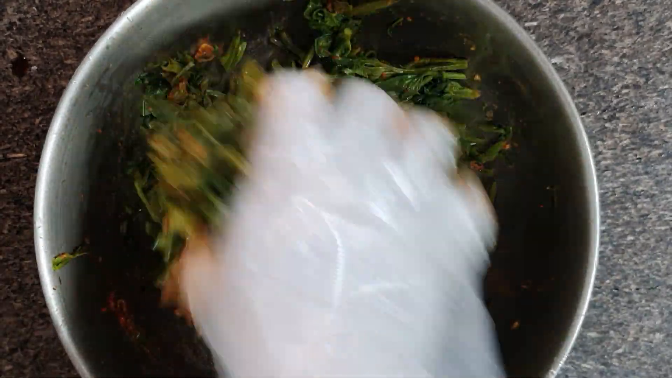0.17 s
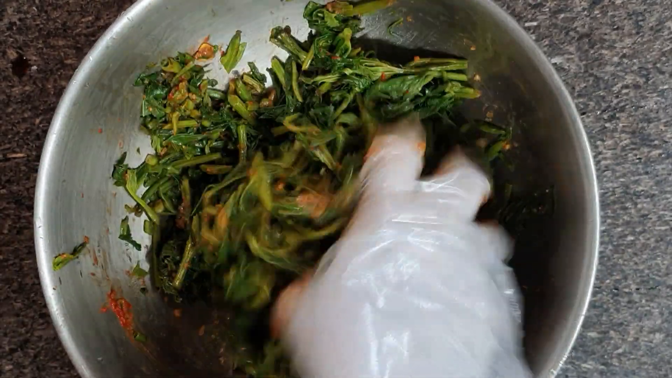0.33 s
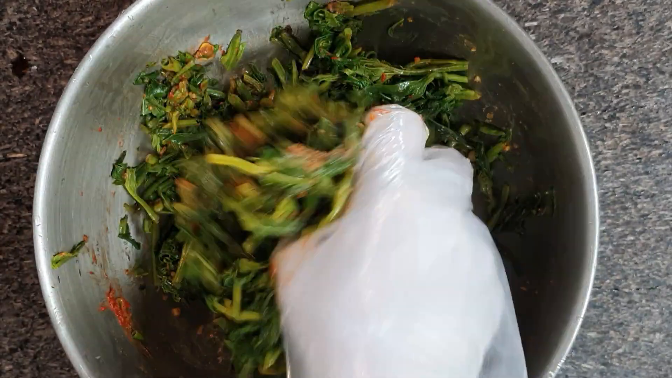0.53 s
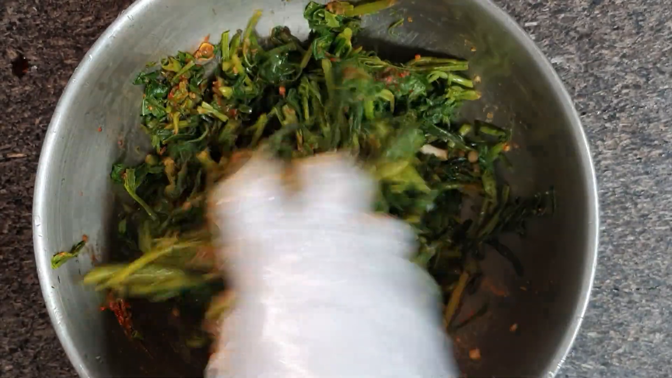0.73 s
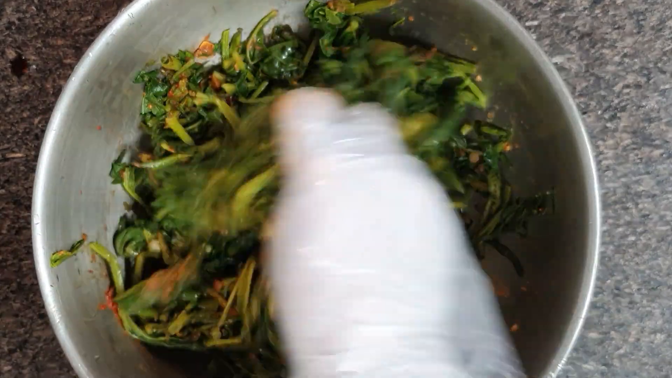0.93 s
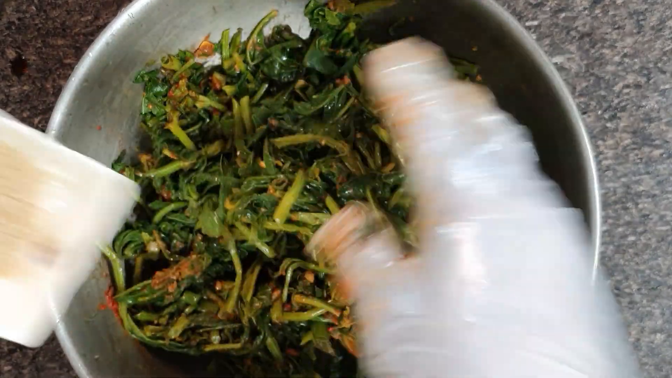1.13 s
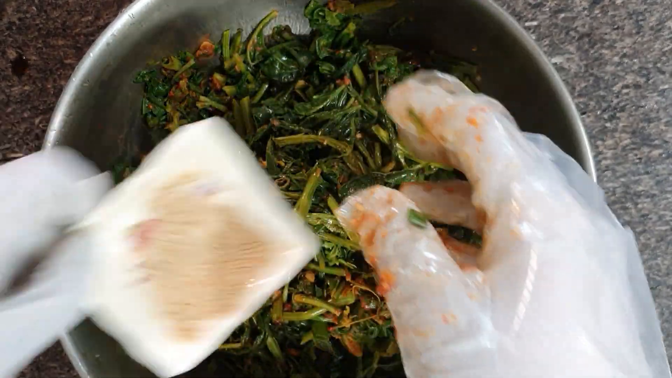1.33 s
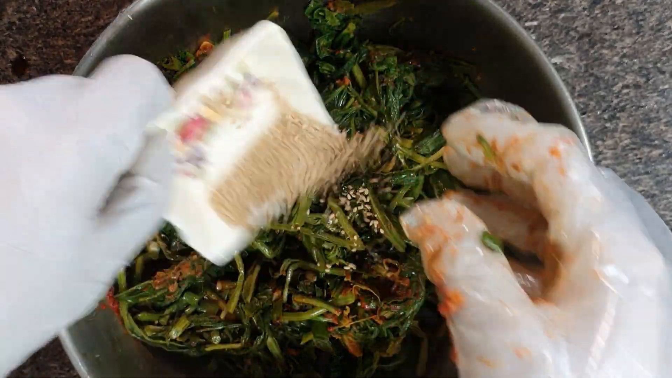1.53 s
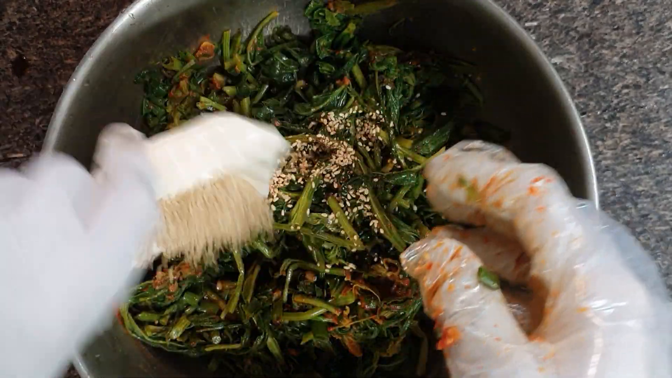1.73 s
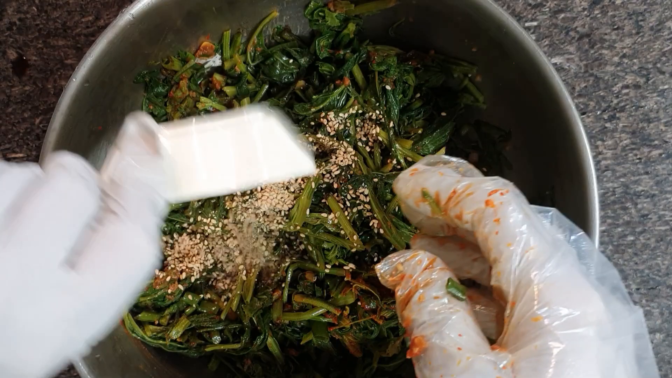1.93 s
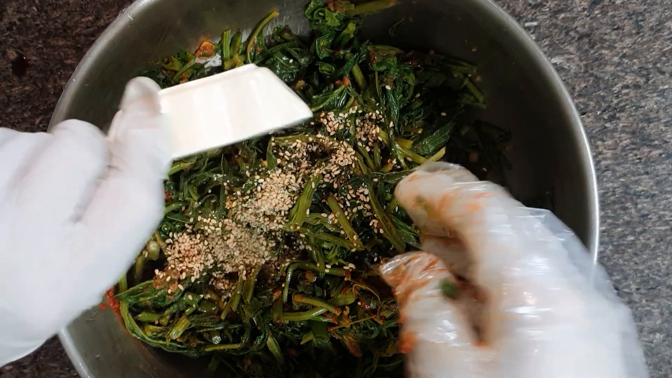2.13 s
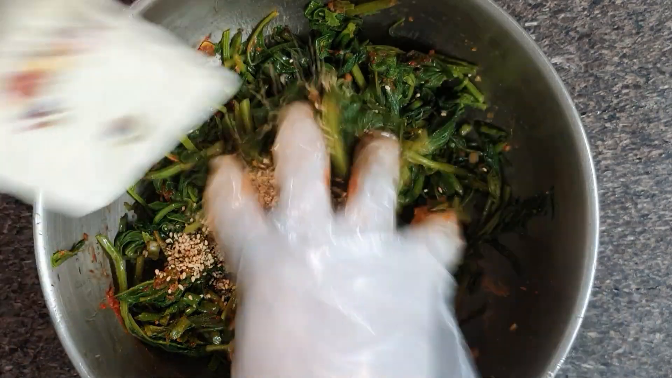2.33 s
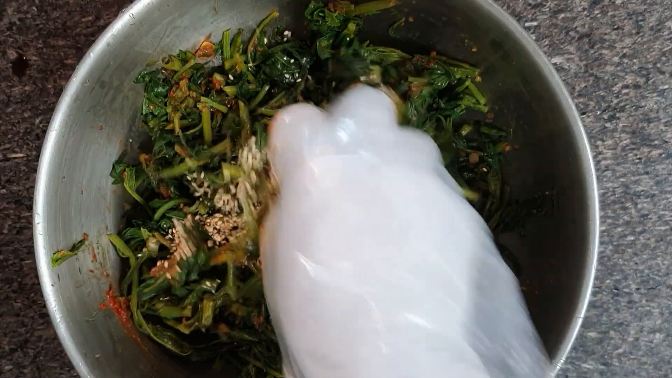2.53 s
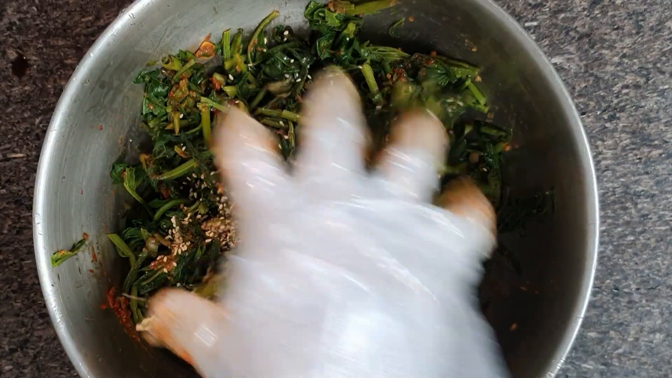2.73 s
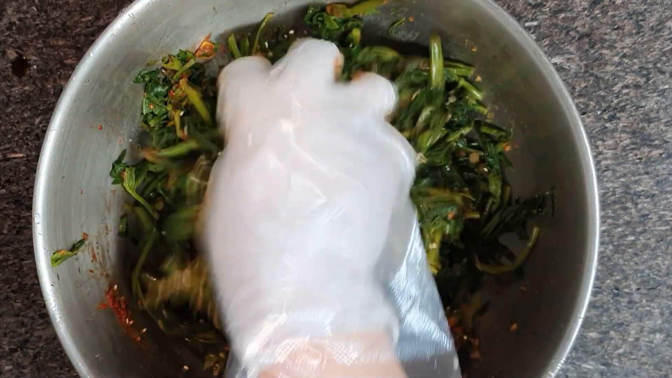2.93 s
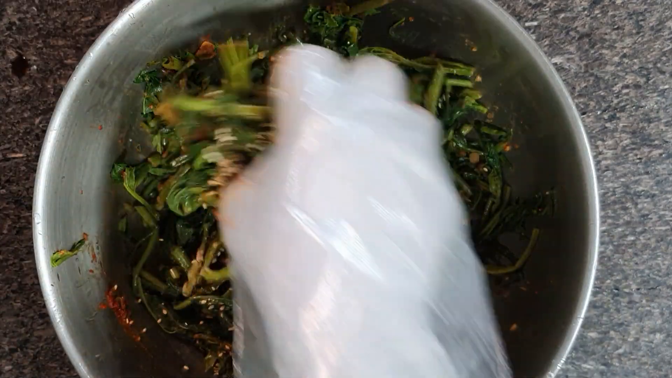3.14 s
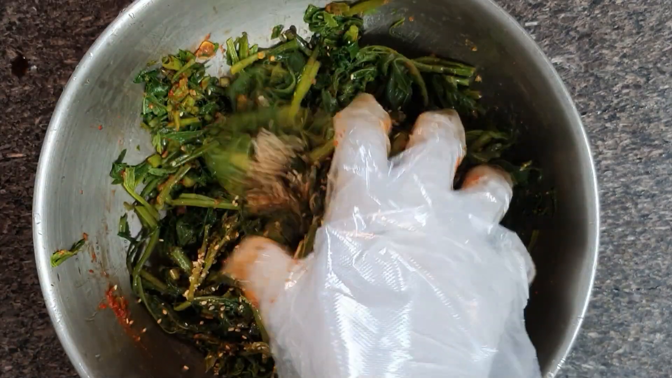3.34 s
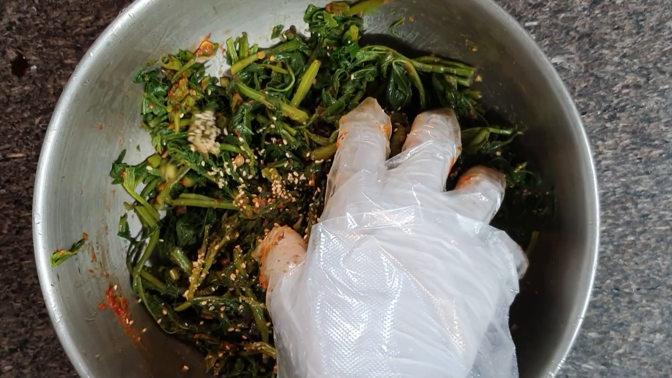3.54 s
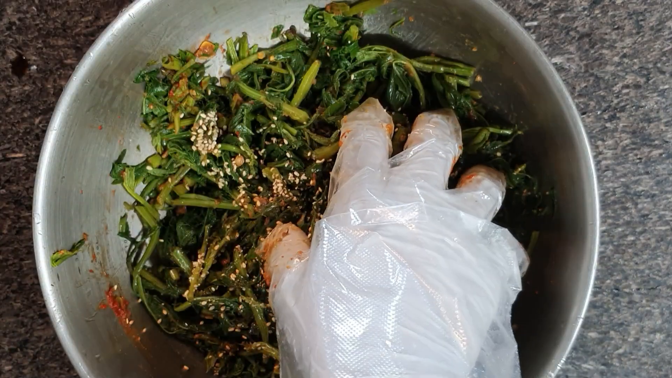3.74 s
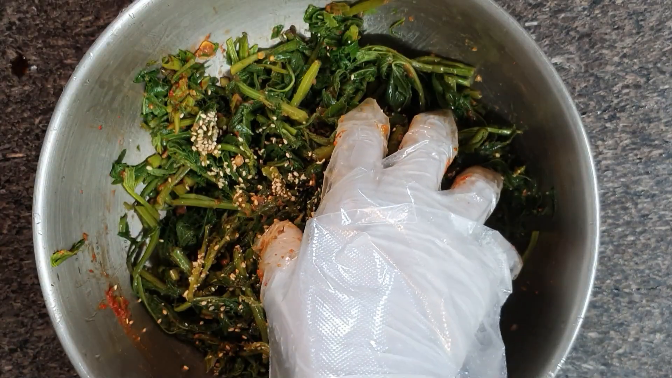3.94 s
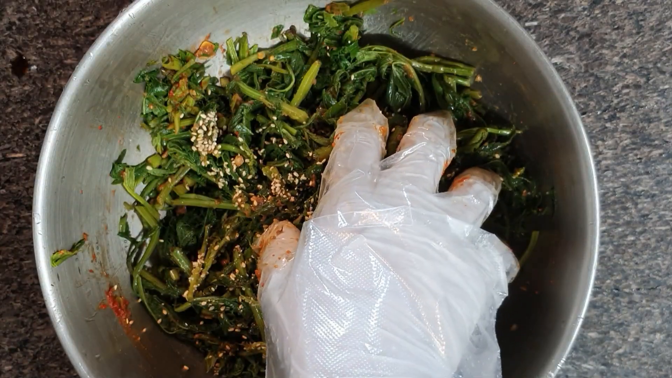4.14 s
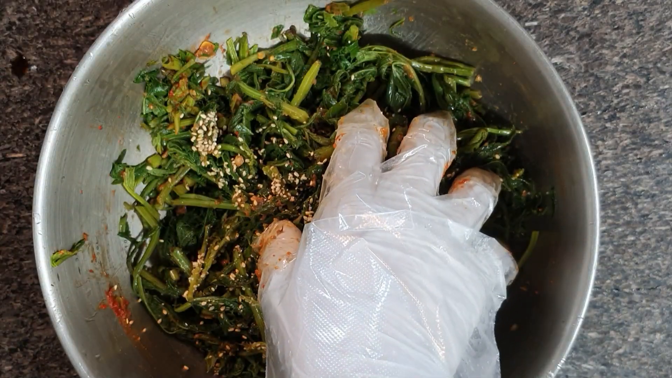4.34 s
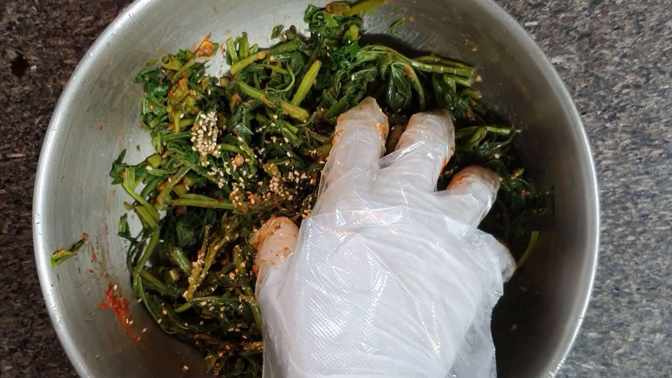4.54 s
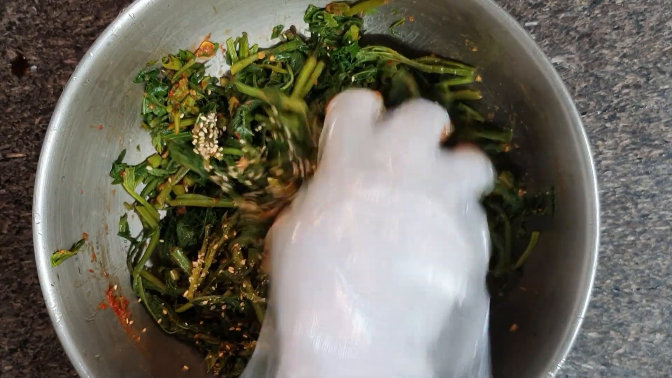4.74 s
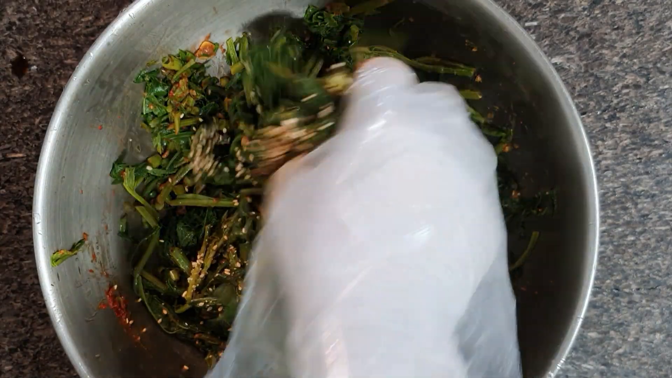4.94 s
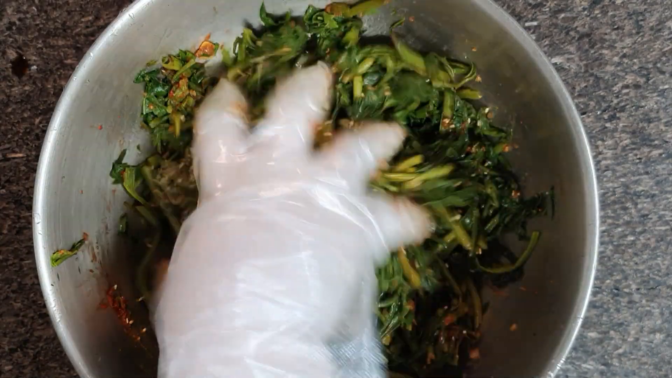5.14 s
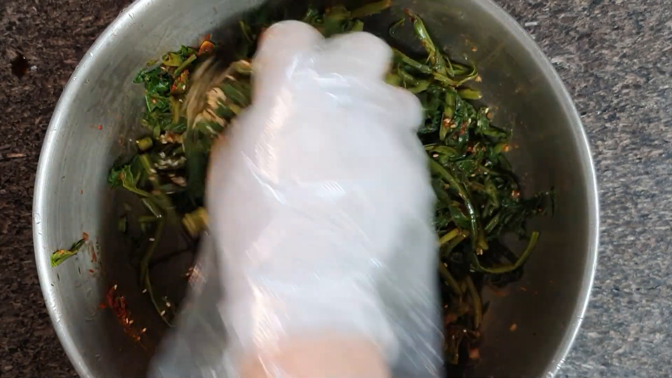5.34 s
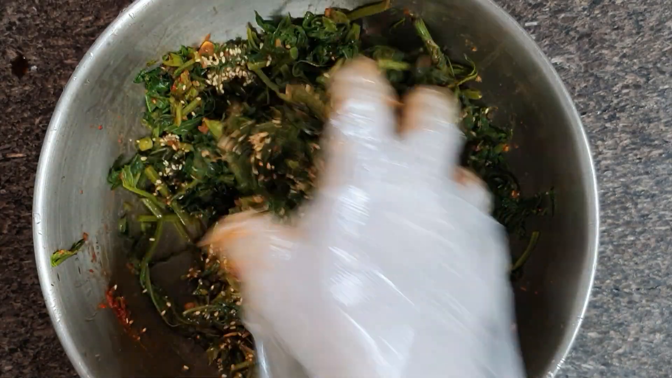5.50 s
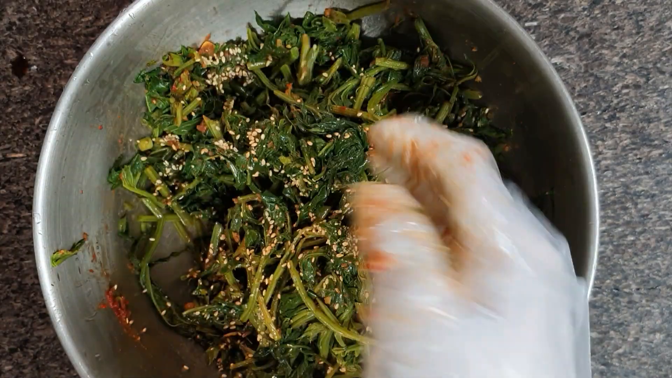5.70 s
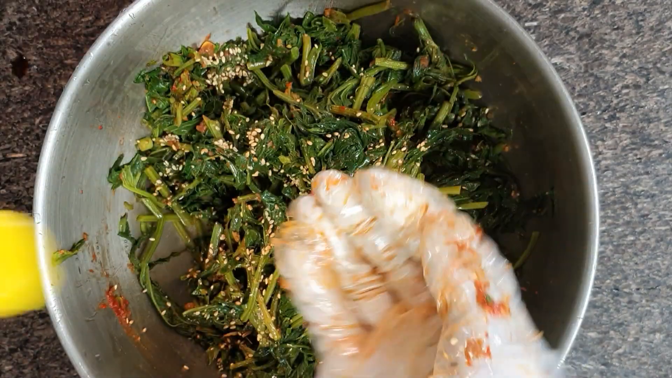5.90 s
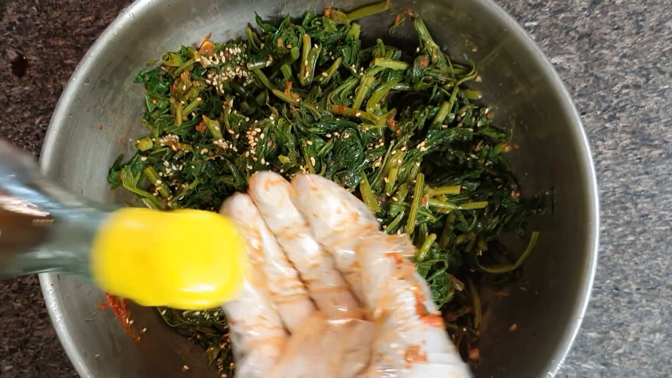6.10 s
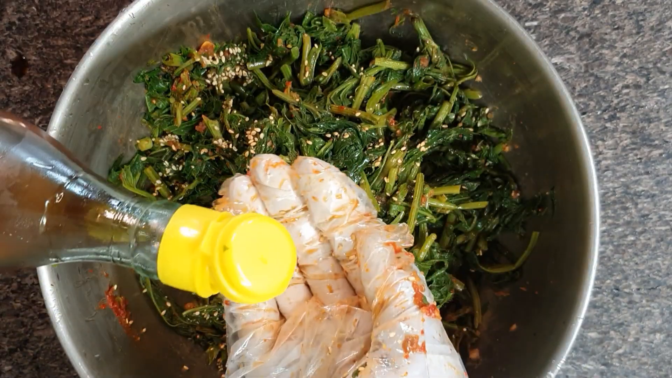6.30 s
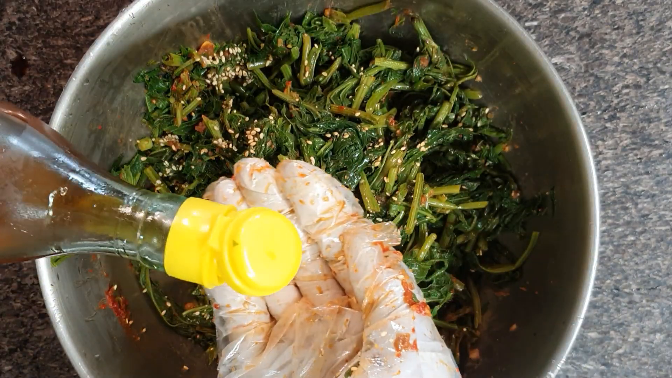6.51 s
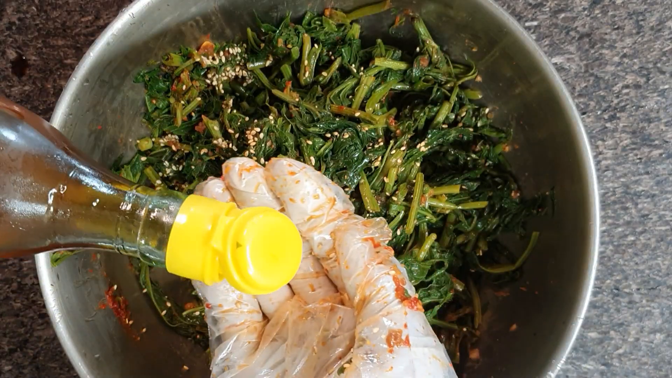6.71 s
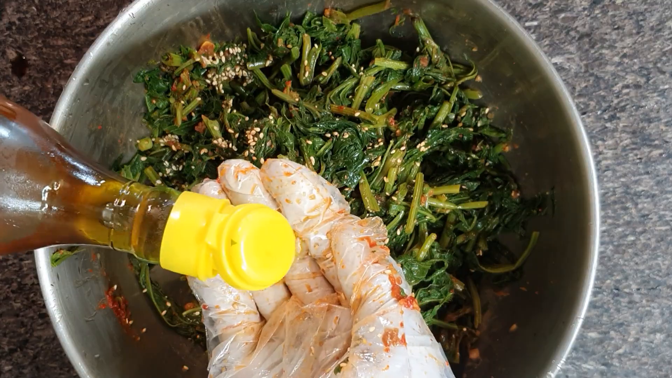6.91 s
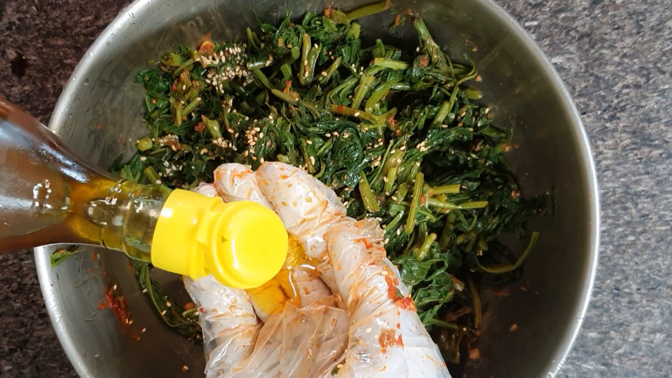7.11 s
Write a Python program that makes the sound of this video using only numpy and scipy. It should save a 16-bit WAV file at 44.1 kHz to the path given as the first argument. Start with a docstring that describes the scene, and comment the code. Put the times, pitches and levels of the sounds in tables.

```python
"""A hard kitchen, microphones close above a stone counter: a fridge rumbles and hums from the start.
Right under the microphones thin plastic gloves crackle in swarms of tiny clicks, over wet greens that
slap and pop in a steel bowl. Sesame seeds patter off a small dish, as bright grains; then the dish clinks
down at the left and bounces, as dying modes over a clatter of the counter. Last, a cupboard door knocks
and judders, its panels ringing, while the hands work on; tiles and stone add a short tail."""
import sys
import numpy as np
from scipy import signal
from scipy.fft import rfft, irfft, next_fast_len
from scipy.io import wavfile
from scipy.ndimage import uniform_filter1d

SR = 44100
rng = np.random.default_rng(int(sys.argv[2]) if len(sys.argv) > 2 else 0)


def bounce(signal):
    """Save signal as a 16-bit WAV file at the path given by the first command-line argument."""
    frames = np.transpose(np.atleast_2d(signal))
    limited = np.clip(frames, -1, 1)
    pcm = np.round(limited * 32767).astype(np.int16)
    wavfile.write(sys.argv[1], SR, pcm)


N = 320166

# In all tables levels are relative, and a left-right balance above 0 dB leans to the left.
# Fridge and air as a filter. Each row: frequency in Hz, gain in dB.
HUSH_SPECTRUM = [(12, -71), (20, -48.5), (48, -8), (102, -15.5), (265, 0.5), (289, -8), (506, -11.5),
                 (551, -15), (599, -10.5), (709, -19.5), (863, -21.5), (1020, -26.5), (1700, -40.5),
                 (2200, -40), (3140, -50.5), (15200, -43.5), (16500, -67.5)]
# Slow swell of the fridge and air. Each row: time in seconds, gain in dB.
HUSH_SWELL = [(0, 1.5), (2, 2), (4, 1), (5.8, 1.5), (6.3, 0.5), (7.26, 0.5)]
# Mains hum. Each row: frequency in Hz, level in dB.
HUM_TONES = [(59, -73), (119, -72)]
# How alike left and right are. Each row: frequency in Hz, likeness from 0 to 1.
LEFT_RIGHT_LIKENESS = [(50, 0.81), (300, 0.83), (600, 0.24), (1200, 0.17), (2500, 0.25), (8000, 0.12)]
# Grips, tosses and shifts of a hand. Each row: time of full force in seconds, hold in seconds,
# glove level in dB, leaves level in dB.
GRIPS = [(0.0, .01, -57, -51), (0.111, 0.04, -43, -49.5), (0.339, 0.024, -38.5, -36.5),
         (0.559, 0.022, -47, -48), (0.672, 0.018, -51, -51.5), (0.79, 0.019, -35.5, -37),
         (0.994, 0.055, -49.5, -55.5), (1.204, 0.033, -55.5, -60), (2.005, .02, -61, -62),
         (2.25, 0.03, -49.5, -57.5), (2.347, 0.05, -36.5, -38.5), (2.603, 0.022, -44.5, -50),
         (2.68, 0.021, -51.5, -49), (2.824, 0.046, -41.5, -50), (2.92, 0.023, -43, -39),
         (3.17, 0.069, -54, -58), (3.38, 0.11, -52, -63), (3.691, 0.019, -57, -64), (3.88, .01, -69, -70),
         (4.022, 0.1, -57, -67), (4.307, 0.013, -57.5, -62), (4.467, 0.051, -66.5, -78),
         (4.68, 0.11, -44, -47), (5.007, 0.018, -45.5, -47.5), (5.15, 0.059, -39.5, -38),
         (5.383, 0.051, -48, -50.5), (5.648, 0.19, -53, -53.5), (6.272, 0.008, -71, -63.5),
         (6.809, .01, -67.5, -72.5)]
# Faint stirring between grips. Each row: time in seconds, glove level in dB, leaves level in dB.
STIRRING = [(0, -64, -57), (1.1, -55.5, -58.5), (1.6, -60.5, -63), (1.8, -69, -68.5), (2.15, -67.5, -68.5),
            (2.5, -61, -59), (3.3, -59, -55), (3.8, -75, -70.5), (4.25, -72.5, -82.5), (4.6, -57.5, -57),
            (5.55, -59.5, -58), (5.95, -59.5, -61), (6.35, -75.5, -79), (6.75, -89, -81.5),
            (7.26, -83, -80.5)]
# Glove plastic as a filter. Each row: frequency in Hz, gain in dB.
GLOVE_SPECTRUM = [(1470, -28), (2500, -1.5), (3170, -4.5), (4590, -5.5), (7730, -9), (10000, -4),
                  (11800, -4), (15100, -3), (16100, -15), (16500, -29.5)]
# Clearest snaps of the glove. Each row: start in seconds, level in dB, pitch in Hz, left-right balance in dB.
GLOVE_SNAPS = [(0.1215, -23, 12100, 9), (0.2027, -24, 10200, -1), (0.2066, -19.5, 12000, -4),
               (0.24, -28, 12400, -4), (0.2757, -26, 14500, -1.0), (0.319, -20, 13200, 0.5),
               (0.61, -21, 12300, -3), (0.633, -26, 11900, 7), (0.664, -13, 10500, -0.5),
               (0.667, -21, 10500, 3), (0.7916, -20, 14600, 8), (0.993, -23, 11800, -2),
               (1.024, -25, 9500, 6), (1.208, -35, 9000, 3), (2.2065, -23, 11500, 4), (2.23, -30, 12000, 3),
               (2.2977, -21, 9320, 1), (2.3496, -25, 14000, 0.5), (2.5214, -18.5, 12400, 1),
               (2.6852, -21.5, 10500, 3), (2.698, -26, 11600, 1.0), (2.771, -27.5, 12000, 0),
               (2.872, -26, 10000, 0), (2.9667, -24, 13500, 4), (3.127, -33, 12100, 9),
               (3.152, -26.5, 13700, -3), (3.475, -30, 6450, -2), (3.668, -43, 5000, 5),
               (3.868, -35.5, 14300, 2), (4.2787, -21.5, 14200, 12), (4.616, -23.5, 14400, 0.5),
               (4.6934, -25.5, 9950, 13), (4.778, -23, 14100, 4), (4.8373, -26.5, 10300, 3),
               (4.8803, -34, 5740, 3), (4.9842, -29, 12260, -4), (5.024, -24.5, 9000, 2),
               (5.05, -27, 10600, 2), (5.189, -21, 10400, 2), (5.195, -16, 12300, 1),
               (5.3661, -22.5, 9400, 7), (5.431, -24, 12600, -1), (5.629, -30.5, 11000, 5),
               (5.688, -34, 11400, 4), (5.7412, -28.5, 12500, 9), (5.7788, -25, 13300, 0.5),
               (5.8424, -26, 9450, 2.5), (6.2634, -39, 12400, 1.5)]
# Leaves heard inside the bowl, as a filter. Each row: frequency in Hz, gain in dB.
LEAF_SPECTRUM = [(59, -41), (100, -2.5), (347, -8), (504, -10.5), (561, -7), (759, -12), (906, -7.5),
                 (1030, -10.5), (1750, -8), (2240, -4.5), (2780, -10), (3500, -7.5), (7000, -13.5),
                 (9100, -50.5), (15400, -120)]
# Wet pops in the leaves; the low row at 5.145 s is a bump of the bowl. Each row: start in seconds, level in dB,
# pitch in Hz, left-right balance in dB.
WET_POPS = [(0.324, -41, 953, -3), (0.772, -31, 2180, 11), (0.791, -33, 900, 0), (0.811, -39, 940, -12),
            (1.207, -40, 2170, 10), (2.226, -46, 1070, 0), (2.346, -41, 2170, 3), (2.941, -30, 1590, 15.5),
            (5.145, -33, 537, 2), (5.208, -42, 972, 0.5), (5.348, -36, 2220, 3), (5.742, -36, 2590, 5),
            (5.779, -33, 2170, 0.0), (5.842, -33.5, 3600, 1), (6.272, -53, 2000, 1.0),
            (6.774, -62, 4000, 3)]
# The bowl bumps the counter. Each row: start in seconds, level in dB, pitch in Hz.
BOWL_BUMPS = [(2.341, -46, 130), (5.182, -34.5, 370), (5.205, -40.5, 80), (5.223, -43, 91)]
# Seeds sliding off the dish. Each row: time in seconds, level in dB.
SEED_LEVELS = [(1.7, -73), (1.776, -75), (1.784, -56.5), (1.83, -56.5), (1.972, -69), (1.982, -64),
               (2.0, -56), (2.074, -66), (2.2, -85)]
# Small hard ticks. Each row: start in seconds, level in dB, ring pitch in Hz, time to die by 60 dB in
# seconds, left-right balance in dB.
HARD_TICKS = [(1.745, -67, 9018, .1, -5), (1.7865, -63, 9100, 0.09, -4), (1.981, -46.5, 14360, 0.15, -12),
              (4.282, -40, 1780, 0.062, -1), (6.778, -49, 4000, 0.011, 8.5)]
# The dish lands, then bounces. Each row: start in seconds, level in dB, left-right balance in dB.
DISH_CLINKS = [(3.3486, -4.5, 6), (3.482, -15, 2)]
# Pitches of the dish's modes, in Hz.
DISH_MODE_HZ = [560, 748, 1534, 1755, 2085, 2153, 6363, 7063, 7951, 9018, 12160, 13390]
# The same modes. Each row: level in dB on landing, level in dB on the bounce, time to die by 60 dB in seconds.
DISH_MODES = [(-8.5, 0, 0.097), (-2.5, 9, 0.047), (-9, -8.5, 0.097), (-12.5, 11, 0.074), (-5.5, -12, 0.047),
              (-1.5, 4, 0.29), (-20, 3.5, 0.12), (-13.5, -22, .07), (-21, -29, 0.29), (7, -30, 0.08),
              (-14.5, -20, .05), (-4.5, -20, 0.065)]
# Counter clatter under the dish, as a filter. Each row: frequency in Hz, gain in dB.
COUNTER_SPECTRUM = [(120, -46), (200, -13), (650, -10.5), (750, -5), (1150, -10.5), (2110, -4), (2290, -5),
                    (6760, -30.5), (9000, -25), (11700, -46.5), (19800, -120)]
# Blows on the cupboard. Each row: start in seconds, level in dB, centre pitch in Hz, drop in dB per octave
# away from it (negative: a rise), factor on the panels' ring times, clatter in dB against the ring.
CUPBOARD_KNOCKS = [(3.972, -21, 444, 12, 0.93, -27), (4.003, -27.5, 700, 14, 0.79, -27),
                   (4.041, -16, 550, 4, 0.47, -28), (4.053, -22, 520, -1.5, 0.43, -39),
                   (4.085, -25, 680, 9, 0.12, -18), (4.2795, -22.5, 140, 33, 0.29, -11),
                   (4.286, -23.5, 280, 40, 1, -36), (4.351, -29, 400, 3, 0.32, -22),
                   (4.403, -24, 570, 6, 0.6, -21), (4.656, -16, 473, 16, 0.21, -22),
                   (4.709, -20, 453, 3, 0.36, -26), (4.7325, -14.5, 547, -2.5, 0.61, -9.5),
                   (4.742, -40, 520, 3.5, 0.85, -12), (4.768, -16.5, 526, 11, 0.42, -17.5),
                   (4.81, -24, 750, 31, 0.38, -14)]
# Cupboard panels. Each row: pitch in Hz, level in dB, time to die by 60 dB in seconds at a factor of 1.
CUPBOARD_PANELS = [(107, -27, 0.15), (139, -25, 0.11), (213.4, -15.5, 0.63), (284.5, 1.5, 0.13),
                   (349, -3.5, 0.26), (464, 10.5, 0.059), (474, 9, 0.046), (572, 4, 0.15), (680, -8, 0.091),
                   (735, -0.5, 0.14), (857, 8.5, 0.046), (1070, 4, 0.044), (1253, -0.5, 0.14),
                   (1395, 3, 0.083), (1780, -2, 0.051), (2170, -4, 0.066), (2590, -16, 0.22)]
# Door judders after a blow. Each row: time of full force in seconds, hold in seconds, level in dB.
DOOR_JUDDERS = [(3.98, 0.043, -38.5), (4.041, .005, -23.5), (4.268, 0.087, -37), (4.406, .005, -29),
                (4.655, 0.027, -25.5), (4.735, 0.0053, -10)]
# Tail of the kitchen. Each row: frequency in Hz, time to die by 60 dB in seconds.
KITCHEN_T60 = [(100, 0.36), (500, 0.37), (2000, 0.47), (6000, 0.13), (14000, 0.35)]

HUSH_DB = -57  # rms of the air before its swell
GRIP_RISE_DB_PER_S, GRIP_FALL_DB_PER_S = 230.5, 174.5
JUDDER_RISE_DB_PER_S, JUDDER_FALL_DB_PER_S = 2498.5, 296
RIGHT_FIRST, DISH_LEAD, DOOR_LEAD = -3, 12, 14  # samples by which the left microphone leads
BAND_EDGE_HZ = 15950


def gain_of(db):
    """Decibels to an amplitude factor."""
    return 10 ** (np.asarray(db) / 20)


def evened(x):
    """Scales to rms 1."""
    return x / np.sqrt(np.mean(x ** 2) + 1e-20)


def read(points, hz):
    """Reads a table over frequency on a log axis."""
    table_hz, value = np.transpose(points)
    return np.interp(np.log(hz + 1), np.log(table_hz + 1), value)


def follow(rows):
    """Turns a level table into gain over time, all but silent outside its span."""
    s, db = np.transpose(rows)
    return gain_of(np.interp(np.arange(N) / SR, s, db, left=-200, right=-200))


def colour(x, points):
    """Filters by a spectrum table."""
    size = next_fast_len(N)
    gain = gain_of(read(points, np.fft.rfftfreq(size, 1 / SR)))
    return irfft(rfft(x, size) * gain, size)[..., :N]


def add(mix, s, sound, pan_db, lead):
    """Places a sound between two microphones by level and by the samples the left one leads."""
    sound = sound * np.ones((2, 1))
    for channel, side in enumerate((1, -1)):
        start = max(round(s * SR - side * lead / 2), 0)
        part = mix[channel, start:][:sound.shape[1]]
        part += gain_of(side * pan_db / 2) * sound[channel, :len(part)]


def burst(hz, width, t60, same, tail_db=-60):
    """A band of dying noise with near echoes trailing it, partly shared by left and right; peak 1."""
    t = np.arange(4096) / SR
    noise = rng.standard_normal((3, len(t)))
    noise[0, 0] = 3.7  # a firm onset in the shared part
    same = np.clip(same, 0, 1)
    echoes = gain_of(tail_db - 60 * t / .07)
    fade = gain_of(-60 * t / t60) + echoes
    noise = (same * noise[0] + np.sqrt(1 - same ** 2) * noise[1:]) * fade
    edges = np.clip([hz / width, hz * width], 30, SR / 2 - 500)
    out = signal.lfilter(*signal.butter(2, edges, "band", fs=SR), noise)
    return out / abs(out).max()


def grains(per_s, spread_db, low_hz, high_hz, t60, same, count=16):
    """Random clicks of many sizes, shared out among count short sounds; the right hears them first."""
    struck = rng.random(N) < per_s / SR
    size = gain_of(spread_db * np.minimum(rng.exponential(1, N), 5)) * struck
    spot, out = rng.integers(0, count, N), np.zeros((2, N))
    for k, hz in enumerate(np.geomspace(low_hz, high_hz, count)):
        click = burst(hz, 1.795, t60, same)[:, :2048]
        out += signal.oaconvolve((size * (spot == k))[None], click, axes=1)[:, :N]
    return np.array([np.roll(out[0], 3), out[1]])


def ring(hz, db, t60, rise):
    """Dying modes, each of random sign, that build up over rise seconds; peak 1."""
    t = np.arange(SR // 4)[:, None] / SR
    sign = rng.choice([-1, 1], len(hz))
    modes = gain_of(db - 60 * t / t60) * np.sin(2 * np.pi * hz * t) * sign
    out = modes.sum(1) * (1 - np.exp(-t[:, 0] / rise))
    return out / abs(out).max()


def swells(start, hold, db, rise_db_per_s, fall_db_per_s):
    """Gain over time of efforts that rise, hold and fall away; their powers add."""
    t = np.arange(0, N + 64, 64)[:, None] / SR
    early = np.maximum(start - t, 0)
    late = np.maximum(t - start - hold, 0)
    power = gain_of(2 * (db - rise_db_per_s * early - fall_db_per_s * late)).sum(1)
    return np.interp(np.arange(N) / SR, t[:, 0], np.sqrt(power))


def pair(hz, a, b):
    """Makes left and right short-time spectra that are most alike in the bass."""
    same = np.clip(read(LEFT_RIGHT_LIKENESS, hz), -1, 1)[:, None]
    return np.array([a, same * a + np.sqrt(1 - same ** 2) * b])


def hush():
    """Fridge rumble and air, as noise with drifting patches, and a wavering mains hum."""
    frames, hz = N // 512 + 6, np.fft.rfftfreq(2048, 1 / SR)
    a, b, c, d, patches = rng.standard_normal((frames, 1025, 5)).T
    # smoothed over frequency, then over time
    patches = evened(uniform_filter1d(uniform_filter1d(patches, 8, 0), 6, 1))
    gain = gain_of(read(HUSH_SPECTRUM, hz)[:, None] + 1.7 * patches)
    spectra = pair(hz, a + 1j * b, c + 1j * d) * gain
    noise = signal.istft(spectra, nperseg=2048, noverlap=1536)[1][:, :N]
    air = gain_of(HUSH_DB) * evened(noise)
    t = np.arange(N) / SR
    waver = evened(uniform_filter1d(uniform_filter1d(rng.standard_normal(N), 6000), 6000))
    hum = np.zeros(N)
    for tone_hz, db in HUM_TONES:
        hum += gain_of(db + 1.8 * waver) * np.sqrt(2) * np.sin(2 * np.pi * tone_hz * t)
    return (air + hum) * follow(HUSH_SWELL)


def effort(count):
    """How hard the hands work the glove (1) or the leaves (2): grips over faint stirring, powers added."""
    grips, stirring = np.transpose(GRIPS), np.transpose(STIRRING)
    gripped = swells(grips[0], grips[1], grips[1 + count], GRIP_RISE_DB_PER_S, GRIP_FALL_DB_PER_S)
    stirred = follow(np.transpose([stirring[0], stirring[count]]))
    return np.hypot(gripped, stirred)


def glove():
    """Thin plastic buckles in swarms of tiny clicks over a soft rub, with a few large snaps."""
    clicks = grains(per_s=1000, spread_db=5.0, low_hz=5000, high_hz=14900, t60=0.028, same=0.47)
    rub = grains(per_s=4800, spread_db=3.0, low_hz=4000, high_hz=14000, t60=0.027, same=0.38, count=6)
    swarm = evened(clicks) + gain_of(-1.5) * evened(rub)
    out = evened(colour(swarm, GLOVE_SPECTRUM)) * effort(count=1) * gain_of([[.4], [-.6]])
    for s, db, hz, pan_db in GLOVE_SNAPS:
        snap = burst(hz, width=1.7, t60=.006, same=.7, tail_db=-19)
        add(out, s, gain_of(db + 1.5) * snap, pan_db, RIGHT_FIRST)
    return out


def greens():
    """Wet leaves slap, rub and pop as grains inside the bowl, which bumps the counter now and then."""
    swarm = grains(per_s=1500, spread_db=4.0, low_hz=333, high_hz=5000, t60=0.04, same=0.67)
    out = evened(colour(swarm, LEAF_SPECTRUM)) * effort(count=2) * gain_of([[-.4], [-1.6]])
    for s, db, hz, pan_db in WET_POPS:
        pop = burst(hz, width=1.46, t60=.015, same=0.67, tail_db=-7.0)
        add(out, s, gain_of(db + 1.5) * pop, pan_db, RIGHT_FIRST)
    for s, db, hz in BOWL_BUMPS:
        bump = ring(np.array([hz]), db=0, t60=0.046, rise=0.002)
        add(out, s, gain_of(db) * bump, pan_db=0, lead=0)
    return out


def seeds():
    """Sesame seeds slide off the dish in a fine bright patter of dense grains."""
    patter = grains(per_s=5000, spread_db=3.0, low_hz=10000, high_hz=15000, t60=.01, same=.3, count=4)
    return gain_of(-3.0) * evened(patter) * follow(SEED_LEVELS)


def ticks():
    """Small hard contacts: a wide click and one thin ring."""
    out = np.zeros((2, N))
    for s, db, hz, t60, pan_db in HARD_TICKS:
        thin_ring = ring(np.array([hz]), db=0, t60=t60, rise=0.000308)
        click = burst(10500, width=2.5, t60=.006, same=0.94, tail_db=-3)
        add(out, s, gain_of(db - 2.5) * thin_ring, pan_db, lead=0)
        add(out, s, gain_of(db + 9.5) * click, pan_db, lead=0)
    return out


def dish():
    """A crack, a clatter of the counter and the dying modes of the dish, weighted anew on the bounce."""
    out, clatter = np.zeros((2, N)), np.zeros((2, N))
    landing_db, bounce_db, t60 = np.transpose(DISH_MODES)
    for (s, db, pan_db), mode_db in zip(DISH_CLINKS, (landing_db, bounce_db)):
        modes = ring(np.array(DISH_MODE_HZ), mode_db, t60, rise=0.00026)
        crack = burst(3500, width=1.45, t60=.007, same=.8)
        rattle = burst(2000, width=9.0, t60=0.14, same=0.3)
        add(out, s, gain_of(db - 10.5) * modes, pan_db, DISH_LEAD)
        add(out, s + .0015, gain_of(db - 2) * crack, pan_db, DISH_LEAD)
        add(clatter, s, gain_of(db + 6.0) * rattle, pan_db, DISH_LEAD)
    return out + colour(clatter, COUNTER_SPECTRUM)


def cupboard():
    """Each blow weights the panels by distance from a centre pitch; slips of the door shake them all."""
    out = np.zeros((2, N))
    hz, panel_db, t60 = np.transpose(CUPBOARD_PANELS)
    for s, db, centre_hz, drop_db, factor, clatter_db in CUPBOARD_KNOCKS:
        weighted_db = panel_db - drop_db * abs(np.log2(hz / centre_hz))
        panels = ring(hz, weighted_db, factor * t60, rise=0.00069)
        clatter = burst(1500, width=2.5, t60=0.1, same=0.18)
        add(out, s, gain_of(db) * panels, 2.5, DOOR_LEAD)
        add(out, s, gain_of(db + clatter_db) * clatter, 2.5, DOOR_LEAD)
    slip_size = gain_of(4.8 * np.minimum(rng.exponential(1, N), 2))
    slipped = rng.random(N) < 900 / SR  # 900 slips a second on average
    slips = slip_size * slipped * rng.choice([-1, 1], N)
    damped_panels = ring(hz, panel_db, 0.15 * t60, rise=0.00062)
    shake = evened(signal.oaconvolve(slips, damped_panels)[:N])
    judder = swells(*np.transpose(DOOR_JUDDERS), JUDDER_RISE_DB_PER_S, JUDDER_FALL_DB_PER_S)
    add(out, 0, gain_of(-11) * shake * judder, 2.6, DOOR_LEAD)
    return out


def kitchen(x):
    """A dense noise tail off tiles and stone, each band dying at its own speed."""
    taps = rng.standard_normal((2, SR // 2 + SR // 4))
    taps[:, :250] = 0  # a short gap before the tail
    hz, t, spectra = signal.stft(taps, SR, nperseg=256)
    fade = gain_of(-60 * t / read(KITCHEN_T60, hz)[:, None])
    tail = signal.istft(pair(hz, *spectra) * fade, SR, nperseg=256)[1]
    return signal.oaconvolve(x.mean(0)[None], tail / np.linalg.norm(tail[0]), axes=1)[:, :N]


def scene():
    """Near hands get little room, the dish and the cupboard more."""
    hands = glove() + greens() + seeds() + ticks()
    clinks, knocks = dish(), cupboard()
    to_room = gain_of(-8.5) * hands + gain_of(-4.0) * clinks + gain_of(-4.0) * knocks
    return hands + clinks + knocks + kitchen(to_room) + hush()


def record(dry):
    """The microphones drop the deepest bass; then a steep low-pass limits the band."""
    thinned = signal.lfilter(*signal.butter(2, 40, "high", fs=SR), dry)
    low_pass = signal.firwin(511, BAND_EDGE_HZ, window=("kaiser", 9), fs=SR)
    return signal.oaconvolve(thinned, low_pass[None], "same")


dry = scene()
out = record(dry)
bounce(out)
```